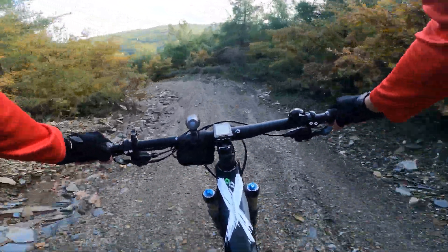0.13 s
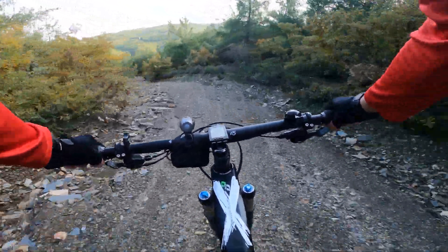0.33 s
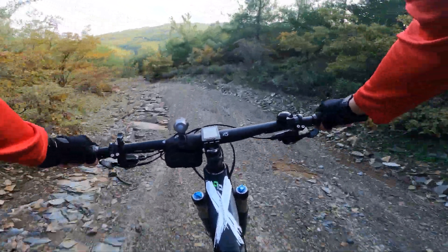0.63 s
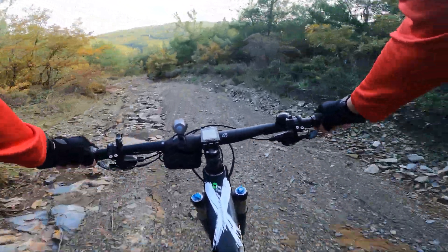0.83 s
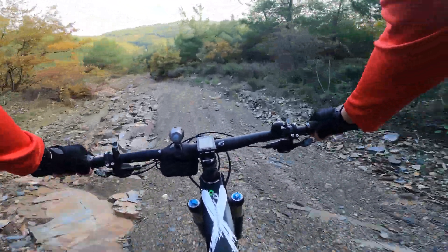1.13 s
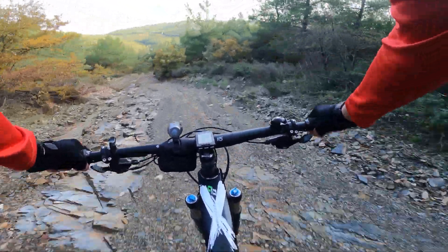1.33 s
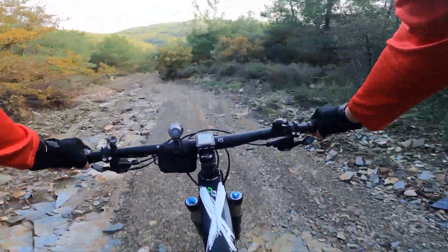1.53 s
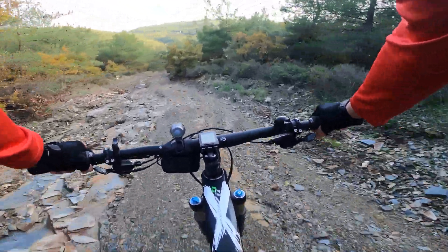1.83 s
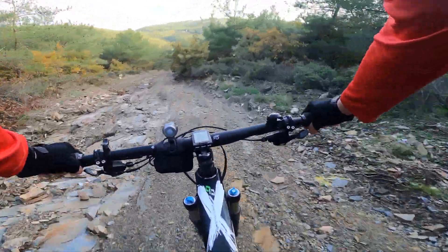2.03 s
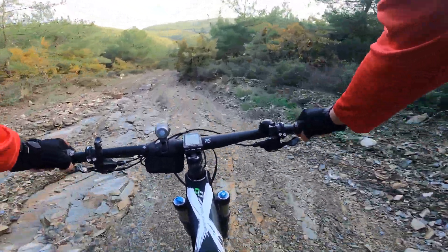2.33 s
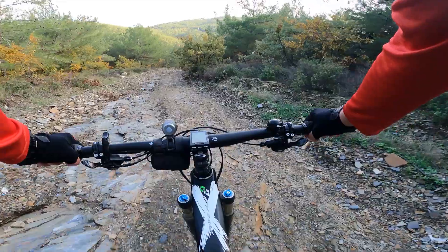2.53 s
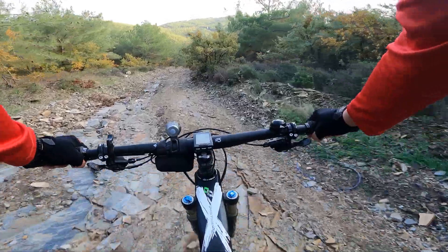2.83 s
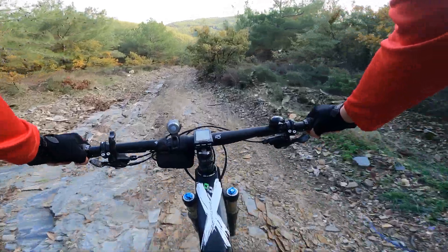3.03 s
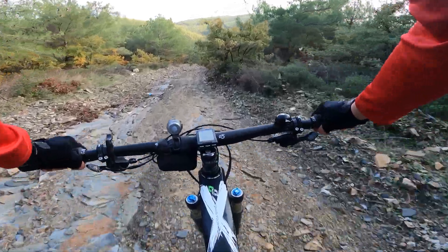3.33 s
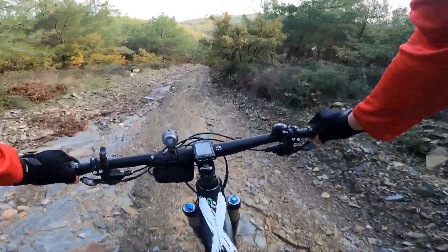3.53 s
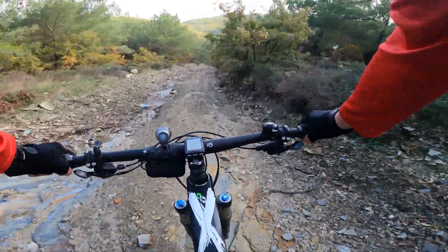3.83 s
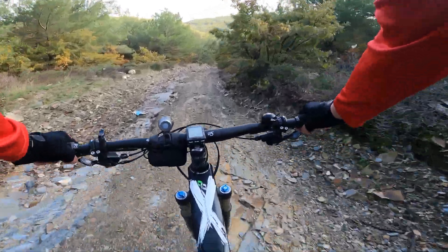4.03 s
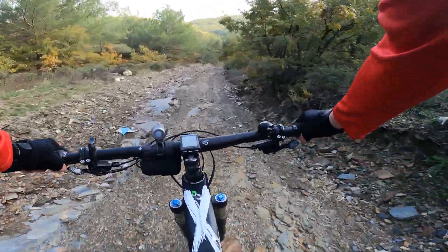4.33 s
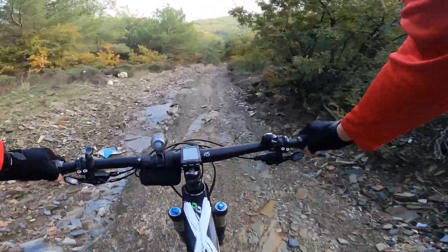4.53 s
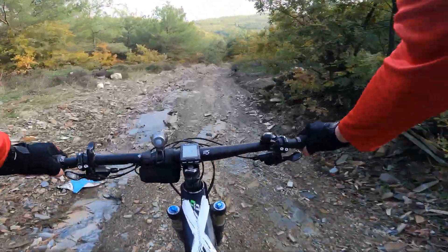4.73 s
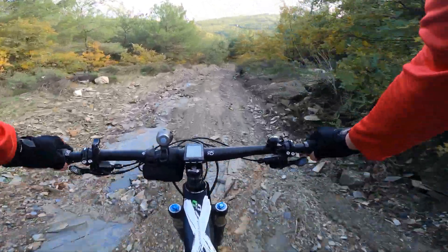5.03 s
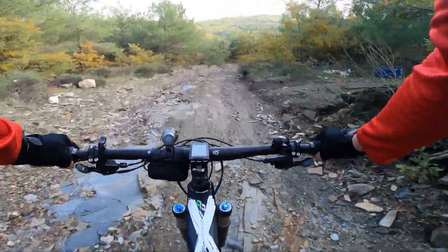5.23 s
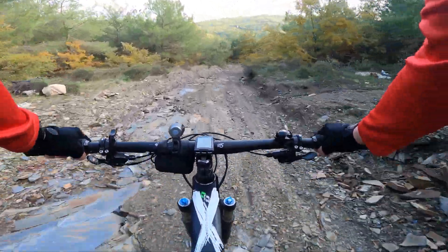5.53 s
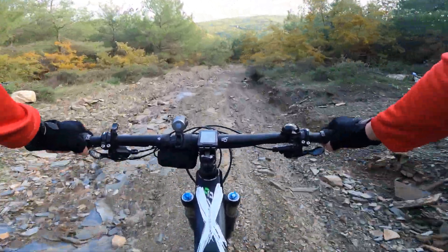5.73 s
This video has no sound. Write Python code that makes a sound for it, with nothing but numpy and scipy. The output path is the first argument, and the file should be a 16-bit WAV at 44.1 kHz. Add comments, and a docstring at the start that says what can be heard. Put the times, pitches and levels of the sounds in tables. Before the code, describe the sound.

Mountain bike rolls over loose stony gravel, tyres crunching and stones knocking the wheels, while low wind buffets the close microphone.

```python
"""Mountain bike on a stony forest track

Place: the bike rolls over loose stones; microphone in a camera on the rider's chest, close above the wheels.
Gravel, slate and grit are random clicks through bands, knocks and resonances; stones, chips and cables are
short damped knocks that also shake the frame or the bar. Wind is band noise in low lumps that weakens as
the bike slows; jolts ring the camera mount, and a thin, very high hiss swells once."""
import sys
import numpy as np
from scipy import signal
from scipy.io import wavfile
from scipy.ndimage import uniform_filter1d

SR = 44100
rng = np.random.default_rng(int(sys.argv[2]) if len(sys.argv) > 2 else 0)


def unload_audio(sound):
    """Save the sound as a 16-bit wav file, at the path given as the first command line argument."""
    columns = np.transpose(np.atleast_2d(sound))
    # keep every value between -1 and 1, then stretch to whole-number steps
    steps = np.round(np.clip(columns, -1, 1) * 32767)
    wavfile.write(sys.argv[1], SR, steps.astype(np.int16))


N = 259749
TIME = np.arange(N) / SR


def from_db(db):
    """Decibels to gain."""
    return 10 ** (np.asarray(db) / 20)


def rms_one(x):
    """Scale to an rms of 1."""
    return x / np.sqrt(np.mean(x ** 2) + 1e-20)


def in_time(rows):
    """Each column of a curve, sample by sample."""
    s, *columns = np.transpose(rows)
    return [np.interp(TIME, s, column) for column in columns]


def butter(x, hz, kind, order=2):
    """Butterworth filter."""
    sos = signal.butter(order, np.clip(hz, 10, .45 * SR), kind, fs=SR, output="sos")
    return signal.sosfilt(sos, x + 1e-18)


def lifted(x, hz, width_hz, lift_db):
    """Raise one narrow band, or lower it if the lift is negative."""
    band = signal.lfilter(*signal.iirpeak(hz, hz / width_hz, fs=SR), x)
    return x + (from_db(lift_db) - 1) * band


def drift(rate):
    """Smooth random wander of rms 1, quicker at a higher rate."""
    r = np.exp(-80 * np.pi * rate / SR)
    noise = rng.standard_normal(N // 40 + 2002)
    # one point every 40 samples; the start-up of the filter is thrown away
    slow = signal.lfilter([1], [1, -2 * r, r * r], noise)[2000:]
    return np.interp(np.arange(N) / 40, np.arange(len(slow)), rms_one(slow))


def bands(spectrum, count):
    """Equal log-spaced bands over a spectrum: (edges, centre in Hz, share of the amplitude)."""
    hz, db = np.transpose(spectrum)
    edges = np.geomspace(hz[0], hz[-1], count + 1)
    centres = np.sqrt(edges[1:] * edges[:-1])
    density = from_db(np.interp(np.log(centres), np.log(hz), db))
    gains = density * np.sqrt(np.diff(edges))
    return zip(zip(edges, edges[1:]), centres, gains / np.linalg.norm(gains))


def grains(per_s, spread_db):
    """Clicks at random moments, of random size and sign; rms 1."""
    at = np.flatnonzero(rng.random(N) < per_s / SR)
    size = from_db(spread_db * np.minimum(rng.exponential(1, len(at)), 4))
    clicks = np.zeros(N)
    clicks[at] = size * rng.choice([-1, 1], len(at))
    return rms_one(clicks)


def body(force, modes, contact_hz):
    """Damped modes struck through a soft contact; a unit click peaks at 1."""
    def respond(x):
        """Sum of the modes with alternating signs, dulled by the contact."""
        out = 0
        for k, (hz, width, db) in enumerate(modes):
            r = np.exp(-np.pi * width / SR)
            zeros = (1 - r * r) / 2 * np.array([1, 0, -1])
            poles = [1, -2 * r * np.cos(2 * np.pi * hz / SR), r * r]
            out = out + (-1) ** k * from_db(db) * signal.lfilter(zeros, poles, x + 1e-18)
        return butter(out, contact_hz, "low")
    return respond(force) / np.abs(respond(signal.unit_impulse(SR // 10))).max()


def taps(rows):
    """One click for each (time, level) row."""
    force = np.zeros(N)
    for s, db in rows:
        force[round(s * SR)] += from_db(db)
    return force


def rubbed(level, modes, per_s, spread_db, contact_hz):
    """A dense run of small contacts keeps a body ringing."""
    return rms_one(body(grains(per_s, spread_db), modes, contact_hz)) * level


def swells(rows, attack_s, release_s):
    """Gain of (start, length, level) events: each rises, holds until its length is up and dies away."""
    power = np.zeros(N)
    for start, length, db in rows:
        age = TIME - start
        shape = np.clip(age / attack_s, 0, 1) * np.exp(-np.maximum(age - length, 0) / release_s)
        power += (from_db(db) * shape) ** 2
    return np.sqrt(power)


def on_top(steady_db, gain):
    """Level in dB of a steady sound with swells added to it."""
    return 10 * np.log10(from_db(steady_db) ** 2 + gain ** 2)


def tock(hz, rise_cycles):
    """A heavily damped knock that swells and dies within a few cycles; envelope peak 1, a quarter second."""
    cycles = hz * np.arange(SR // 4) / SR
    rise = cycles / rise_cycles
    return (rise * np.exp(1 - rise)) ** 3 * np.sin(2 * np.pi * cycles)


# steady airflow on the microphone, dropping as the bike slows: (time [s], relative level [dB])
HEADWIND = [(0, -19), (1.6, -21.5), (2.05, -23.5), (3.9, -25.5), (4.0, -30), (5.5, -30.5), (5.89, -27)]
# gusts on top of it: (start [s], length [s], relative level [dB])
GUSTS = [(0, 0.22, -19.5), (.21, 0.22, -21), (.49, 0.25, -25), (.94, 0.21, -21.5), (1.14, 0.12, -16.5),
         (1.3, 0.085, -21.5), (1.44, 0.11, -18), (1.54, 0.13, -17), (1.89, 0.058, -16.5),
         (2.09, 0.059, -20), (2.2, 0.091, -16.5), (2.35, 0.081, -17.5), (2.53, 0.15, -19),
         (2.74, 0.14, -17.5), (2.94, 0.033, -19.5), (3.16, 0.08, -18.5), (3.34, 0.18, -20.5),
         (3.62, 0.2, -20.5), (3.89, 0.11, -22.5), (4.55, 0.051, -27), (5.27, 0.12, -27),
         (5.58, 0.16, -25.5), (5.83, 0.062, -23.5)]
GUST_ATTACK_S, GUST_RELEASE_S = 0.0049, 0.018
# spectrum of the wind at the microphone: (frequency [Hz], density [dB per Hz])
WIND_SPECTRUM = [(15, 6), (25, -1), (40, 5), (70, 2), (100, -1.5), (135, -9), (165, -15.5), (240, -28.5),
                 (400, -37.5)]


def wind(lump_s=0.08, reach=0.37):
    """Eddies pass the microphone port as a run of low lumps; stronger gusts lean towards higher ones."""
    air_db = on_top(in_time(HEADWIND)[0], swells(GUSTS, GUST_ATTACK_S, GUST_RELEASE_S))
    out = 0
    for edges, hz, gain in bands(WIND_SPECTRUM, count=14):
        lean_db = reach * (air_db - air_db.mean()) * np.log2(hz / 60)
        # a second of run-up settles the narrow low bands
        noise = butter(rng.standard_normal(N + SR), edges, "band")[SR:]
        out = out + gain * from_db(lean_db) * rms_one(noise)
    # level the lumps, so that the gust alone sets their size
    strength = np.sqrt(uniform_filter1d(out ** 2, int(lump_s * SR)) + 1e-3)
    return out / strength * from_db(air_db - 2.5)


SIZZLE_PEAK_S, SIZZLE_DB, SIZZLE_WIDTH_S, SIZZLE_FADE_DB = 5.4, -66.5, 0.61, 7


def sizzle():
    """A thin, very high hiss of band noise swells once and fades on both sides."""
    away = np.hypot(1, (TIME - SIZZLE_PEAK_S) / SIZZLE_WIDTH_S) - 1
    hiss = butter(rng.standard_normal(N), [11600, 13700], "band", order=1)
    return from_db(SIZZLE_DB - SIZZLE_FADE_DB * away) * rms_one(hiss)


# bumps that jolt the camera mount: (time [s], level [dB])
JOLTS = [(.237, -10.5), (.312, -16), (.358, -17.5), (.555, -19), (1.152, -17), (1.222, -13), (1.381, -12.5),
         (1.580, -8.5), (2.248, -16), (3.336, -13), (3.353, -13.5), (3.361, -14), (3.630, -19),
         (3.740, -30), (3.770, -24), (5.848, -27)]
# resonances of the mount: (frequency [Hz], width [Hz], relative level [dB])
MOUNT_MODES = [(128.5, 57, 7.5), (268, 53, 4), (332, 53, -0.5)]


def mount_jolts():
    """Each bump is one soft blow that rings the camera mount at the chest."""
    return body(taps(JOLTS), MOUNT_MODES, contact_hz=513)


KNOCK_RISE_CYCLES, CLACK_RISE_CYCLES = 1.094, 1.74
CRACK_HZ, CRACK_CYCLES = 2600, 0.81  # bright tick shared by stones and cables
SNAP_DB = -9.5  # relative to the clack
# cables that slap the handlebar: (time [s], relative level [dB], pitch [Hz])
CLACKS = [(.506, -19, 2010), (.840, -19, 1750), (1.143, -16, 2080), (1.248, -12, 1840), (1.530, -16, 1820),
          (1.639, -13.5, 1950), (1.659, -16, 1700), (1.728, -16, 1500), (1.733, -16, 1750),
          (1.873, -16.5, 1650), (1.927, -12.5, 1850), (2.155, -13.5, 1560), (2.161, -9, 1650),
          (2.365, -14, 1950), (2.37, -10.5, 1830), (2.563, -15.5, 1850), (2.864, -13, 1850),
          (2.905, -24, 1700), (3.162, -12, 1780), (3.206, -17.5, 1700), (3.7285, -10.5, 1710),
          (3.735, -20, 1760), (3.764, -10.5, 1760), (4.036, -16.5, 1820), (4.428, -18.5, 2200),
          (4.663, -16, 1940), (4.702, -19, 1840), (4.836, -19, 1720), (4.904, -18, 1820),
          (5.5775, -8, 1860), (5.782, -17, 1880)]


def cables(bar_hz=760, bar_db=-11):
    """A cable housing slaps the bar: one dry clack, a bright snap near its peak, a duller knock of the bar."""
    out = np.zeros(N + SR)
    snap = from_db(SNAP_DB) * tock(CRACK_HZ, CRACK_CYCLES)
    bar = from_db(bar_db) * tock(bar_hz, KNOCK_RISE_CYCLES)
    for s, level_db, hz in CLACKS:
        slap = tock(hz, CLACK_RISE_CYCLES) + bar
        out[round(s * SR):][:len(slap)] += from_db(level_db) * slap
        # the snap starts one cycle into the clack
        out[round((s + 1 / hz) * SR):][:len(slap)] += from_db(level_db) * snap
    return out[:N]


# small chips that snap from under the tread: (time [s], relative level [dB], hardness [dB per octave])
CHIPS = [(.279, -26, -6), (.348, -20, 4), (.452, -21.5, 2), (.567, -29, 14), (.613, -16, -18),
         (.615, -17, -19), (.840, -23, -1), (.950, -16.5, -18), (1.126, -19, 0), (1.142, -28, 12),
         (2.256, -22, 14), (2.371, -24, 1), (2.904, -23, -13), (3.164, -21, 3), (3.584, -20, 3),
         (3.660, -23, 5), (3.794, -23, 0), (4.068, -24, -15), (4.082, -23, -10), (4.428, -30, -13),
         (4.837, -24, 2), (5.07, -23, -1), (5.200, -22, -6), (5.555, -27, 7), (5.828, -29, -2)]
# resonances of small chips: (frequency [Hz], width [Hz], relative level [dB])
CHIP_MODES = [(2620, 140, 19.5), (3270, 210, 21.5), (5160, 2500, 6), (6900, 1500, -11)]


def chips():
    """Each chip snaps with one bright tick; a hard one excites the higher modes more."""
    out, snap = np.zeros(N + SR), signal.unit_impulse(SR // 20)
    for s, level_db, hardness in CHIPS:
        modes = [(hz, width, db + hardness * np.log2(hz / 3000)) for hz, width, db in CHIP_MODES]
        out[round(s * SR):][:len(snap)] += from_db(level_db) * body(snap, modes, contact_hz=8040)
    return butter(out[:N], 10000, "low", order=4)


# hard hits that leave a short hollow ring: (time [s], relative level [dB], starting pitch [Hz])
RINGS = [(4.068, -21.5, 1004), (4.735, -26, 885), (4.839, -22.5, 560), (5.206, -21.5, 1035)]
RING_SAG_PER_S, RING_ATTACK_S, RING_T60_S = 14, 0.0025, 0.16


def rings(rough=0.4):
    """A hollow, slightly rough ring slides down in pitch as it dies."""
    out, age = np.zeros(N + SR), np.arange(SR // 6) / SR
    envelope = np.minimum(age / RING_ATTACK_S, 1) * from_db(-60 * age / RING_T60_S)
    for s, level_db, hz in RINGS:
        pitch_hz = hz * np.exp(-RING_SAG_PER_S * age)
        tone = np.sin(2 * np.pi * np.cumsum(pitch_hz) / SR)
        flutter = 1 + rough * rms_one(butter(rng.standard_normal(len(age)), 200, "low"))
        out[round(s * SR):][:len(age)] += from_db(level_db) * envelope * flutter * tone
    return out[:N]


# a tyre scrubs sideways through loose slate: (start [s], length [s], relative level [dB])
SCRUBS = [(1.16, 0.244, -26.5), (1.415, 0.027, -21.5), (1.5, 0.033, -23.5)]
SCRUB_ATTACK_S, SCRUB_RELEASE_S = 0.0066, 0.0063
# resonances of the slate: (frequency [Hz], width [Hz], relative level [dB])
SLATE_MODES = [(770, 80, 10), (1050, 330, 6.5), (1266, 330, 7.5), (1900, 260, 0), (3170, 930, -7)]


def slate_scrub():
    """Many small contacts keep the loose slate ringing while the tyre scrubs through it."""
    level = swells(SCRUBS, SCRUB_ATTACK_S, SCRUB_RELEASE_S)
    return rubbed(level, SLATE_MODES, per_s=900, spread_db=-0.5, contact_hz=4130)


# steady drumming of the tread knobs: (time [s], relative level [dB])
TREAD = [(0, -32.5), (2.2, -33), (2.45, -38), (4.3, -34), (4.8, -33.5), (5.5, -37)]
# the knobs drum over slabs of bare rock: (start [s], length [s], relative level [dB])
SLABS = [(.22, 0.26, -34), (1.33, 0.14, -25), (1.54, 0.046, -26), (4.82, 0.084, -30.5), (5.12, 0.11, -29.5)]
SLAB_ATTACK_S, SLAB_RELEASE_S = 0.018, 0.032
# resonances of the tyre, also thudded by stones: (frequency [Hz], width [Hz], relative level [dB])
TYRE_MODES = [(247, 52, 1.4), (350.6, 54, 0.36), (466, 122, -1.3)]


def drumming():
    """Tread knobs strike the ground and keep the tyre's low modes ringing, louder on slabs."""
    tread_db = on_top(in_time(TREAD)[0], swells(SLABS, SLAB_ATTACK_S, SLAB_RELEASE_S))
    return rubbed(from_db(tread_db), TYRE_MODES, per_s=400, spread_db=0.5, contact_hz=850)


# resonances of frame and wheels: (frequency [Hz], width [Hz], relative level [dB])
FRAME_MODES = [(274, 83, -5.5), (444, 114, 9), (650, 234, 3), (926, 184, 4), (1426, 104, -1.5),
               (2000, 540, -4.5), (2920, 200, -10), (3240, 210, -12.5)]


def frame(blow, hardness):
    """Frame and wheels ring briefly; a hard stone excites the higher modes more."""
    modes = [(hz, width, db + hardness * np.log2(hz / 900)) for hz, width, db in FRAME_MODES]
    return body(blow, modes, contact_hz=3750)


def chatter(t60, per_s, level_db, first_db, bounce_s=0.0039):
    """One firm touch, a short bounce, then a dying run of small random ones; a quarter of a second."""
    age = np.arange(SR // 4) / SR
    happens = rng.random(len(age)) < per_s / SR
    touches = happens * rng.uniform(-1.47, 1, len(age)) * from_db(level_db - 60 * age / t60)
    touches = touches * np.minimum(age / bounce_s, 1) ** 2
    touches[0] = from_db(first_db)
    return touches


RATTLE_T60_S = .16
KNOCK_Q, KNOCK_LIFT_DB = 18, 2.5  # the rattle is lifted at the pitch of the knock
CRACK_DB, THUD_DB, THUD_CONTACT_HZ = -15, -12, 600
# stones that strike the wheels: (time [s], relative level [dB], hardness [dB per octave],
# rattle afterwards [dB], pitch of the knock [Hz])
STONES = [(.034, -17.5, -11, -9, 750), (0.227, -21.5, 0.5, 0.5, 700), (.262, -18, -8, -5, 850),
          (.278, -14.5, 5, -27, 770), (.339, -15, 4, -16, 760), (.506, -18, -4, -23, 845),
          (0.554, -16, 1, -21, 456), (0.561, -20, 5, -23, 1200), (1.143, -16, 13, -25, 840),
          (1.222, -14.5, 6, -20, 940), (1.379, -13, 16, -24, 920), (1.574, -15, -3, -14, 990),
          (1.989, -24, 9, -19, 750), (2.251, -15.5, 4, -14, 1010), (2.737, -18, 2, -12, 820),
          (2.905, -14, 7, -17, 1110), (3.135, -12, 2.5, -4.5, 840), (3.147, -12.5, 4, -22, 910),
          (3.356, -12.5, -14, -7, 640), (3.464, -17.5, -2, -6, 555), (3.517, -12.5, 4, -19, 486),
          (3.550, -14, -5, -11, 844), (3.630, -10.5, 10, -24, 684), (3.786, -23, -5, -18, 665),
          (3.95, -18, -6, -16, 800), (4.067, -13, 7, -10.5, 910), (4.157, -11.5, -1, -14, 770),
          (4.173, -17.5, 2, -5.5, 685), (4.217, -22, 2, -16, 690), (4.303, -25, 6, -5, 705),
          (4.314, -12.5, 2.5, -8, 700), (4.370, -19, 2, -6, 585), (4.390, -15, 3, -17, 520),
          (4.715, -18, 6, -6, 720), (4.735, -20, -7, -6, 845), (4.813, -22.5, 15, -2.5, 496),
          (4.836, -11, 2, -15, 453), (4.845, -24, -7, -19, 784), (4.907, -20.5, -0.5, -2.5, 445),
          (5.039, -15.5, 2, -22, 740), (5.070, -15, 7, -11, 764), (5.079, -15.5, -5, -17, 417),
          (5.141, -14.5, 2, -8.5, 750), (5.159, -11.5, 1.5, -8.5, 840), (5.168, -13, -7, -7, 570),
          (5.199, -18.5, 4, -5.5, 523), (5.816, -15.5, 1, -14, 925), (5.878, -18.5, -2.5, -2, 770)]


def stones(crack_lean=0.6):
    """Each stone cracks, knocks and thuds through the tyre; chain and loose parts chatter on the frame."""
    out = np.zeros(N + SR)
    for s, level_db, hardness, rattle_db, hz in STONES:
        blow = chatter(RATTLE_T60_S, per_s=900, level_db=rattle_db, first_db=-5.5)
        rattle = lifted(frame(blow, hardness), hz, hz / KNOCK_Q, KNOCK_LIFT_DB)
        crack = from_db(CRACK_DB + crack_lean * min(hardness, 3)) * tock(CRACK_HZ, CRACK_CYCLES)
        gain, at = from_db(level_db), round(s * SR)
        out[at:][:len(blow)] += gain * tock(hz, KNOCK_RISE_CYCLES)
        # the stone cracks and the frame is shaken as the knock peaks
        peak_at = at + round(KNOCK_RISE_CYCLES / hz * SR)
        out[peak_at:][:len(blow)] += gain * (crack + rattle)
    blows = taps([(s, db + THUD_DB) for s, db, *_ in STONES])
    thuds = body(blows, TYRE_MODES, THUD_CONTACT_HZ)
    return butter(out[:N], 15000, "low", order=4) + thuds


# sprays of sand thrown off the tread: (start [s], length [s], relative level [dB])
SPRAYS = [(1.5, 0.061, -39), (1.96, 0.056, -37.5)]
SPRAY_ATTACK_S, SPRAY_RELEASE_S = 0.012, 0.01
# spectrum of the grit: (frequency [Hz], density [dB per Hz])
GRIT_SPECTRUM = [(2350, -5.5), (2800, -1.5), (3300, 3), (3800, -1), (4200, -1), (4400, 1), (4800, 0.5),
                 (5500, 0), (6100, -6), (7700, -9), (9000, -16), (10000, -22.5), (11000, -26.5),
                 (12300, -40)]


def grit(grit_db, load, patchy_db=2.0):
    """Sand and tiny chips crackle so densely that they merge into a hiss."""
    level_db = on_top(grit_db + 3, swells(SPRAYS, SPRAY_ATTACK_S, SPRAY_RELEASE_S))
    out = 0
    for edges, hz, gain in bands(GRIT_SPECTRUM, count=32):
        crackle = rms_one(butter(grains(7000, 0.99), edges, "band"))
        out = out + gain * crackle * from_db(patchy_db * drift(27))
    return out * from_db(level_db - 1.72 + 0.88 * load)


def pebbles(crunch_db, fineness, load, per_s=150, below_db=-5.5, rise_cycles=1.16, lean_db=-4.0, clump_db=1.5):
    """Slate flakes tick in clumps as the tyre presses, each at its own pitch; fine gravel ticks higher."""
    pitches, ticks = np.geomspace(650, 3000, num=12), 0
    for hz in pitches:
        hits = grains(per_s / len(pitches), spread_db=-2.5)
        knocks = signal.oaconvolve(hits, tock(hz, rise_cycles))[:N]
        size = from_db((lean_db + fineness) * np.log2(hz / 1200))
        ticks = ticks + size * rms_one(knocks)
    return rms_one(ticks * from_db(clump_db * load)) * from_db(crunch_db + below_db)


# spectrum of the gravel crunch: (frequency [Hz], density [dB per Hz])
CRUNCH_SPECTRUM = [(185, 3.5), (250, 5), (310, 0), (480, 3), (900, 3), (1150, -2), (1800, -2), (2100, -3),
                   (2400, -9), (3100, -10.5)]


def gravel(crunch_db, fineness, load, spread_db=3.0, patchy_db=1.5, together=0.76):
    """Pebbles grind and collide under the tread; more of them collide where the crunch is louder."""
    per_s = 1800 * from_db(crunch_db - crunch_db.mean())
    broad, out = grains(per_s, spread_db), 0
    for edges, hz, gain in bands(CRUNCH_SPECTRUM, count=30):
        # a collision is heard in all bands, each pebble's own ring in only one
        own = grains(per_s / 2, spread_db)
        clicks = np.sqrt(together) * broad + np.sqrt(1 - together) * own
        lean_db = fineness * np.log2(hz / 800)
        ring = rms_one(butter(clicks, edges, "band"))
        out = out + gain * ring * from_db(lean_db + patchy_db * drift(28.4))
    return rms_one(out) * from_db(crunch_db + 1.8 * load)


# ground under the tyres: (time [s], gravel crunch, relative level [dB], fine grit, relative level [dB])
GROUND = [(0.0, -32, -43.5), (.19, -33, -43), (.25, -30, -42.5), (0.51, -29, -42.5), (0.95, -29.5, -39.5),
          (1.16, -27, -39.5), (1.36, -25, -39.5), (1.44, -25, -46), (1.475, -31, -42), (1.51, -27, -42.5),
          (1.6, -28, -42), (1.9, -28, -42), (2.26, -29, -42.5), (3.1, -32, -42), (3.58, -29, -42),
          (3.82, -31, -44.5), (4.15, -33.5, -44), (4.5, -34, -44), (4.69, -32, -43), (5.0, -31, -44),
          (5.49, -34, -45), (5.89, -31, -44)]
# size of the gravel: (time [s], lean of the crunch towards the treble [dB per octave])
FINENESS = [(0, 2.8), (.6, 0.9), (1.25, 1.5), (1.5, -1), (1.8, 0.1), (2.5, 1.5), (3.1, 1), (3.5, -1),
            (4.6, 0.5), (5.2, -2.5), (5.5, 1.1)]


def rolling():
    """Both tyres on the track: gravel, grit and pebbles share one fluctuating tyre pressure."""
    crunch_db, grit_db = in_time(GROUND)
    fineness, = in_time(FINENESS)
    # the tyres press and lift quickly; the suspension caps the pressure
    load = np.minimum(rms_one(butter(drift(18.5), 13.4, "high")), 1)
    return gravel(crunch_db, fineness, load) + grit(grit_db, load) + pebbles(crunch_db, fineness, load)


def scene():
    """Wind, mount, bike and tyres in one channel."""
    air = wind() + sizzle()
    parts = cables() + chips() + rings() + stones()
    tyres = slate_scrub() + drumming() + rolling()
    bike = from_db(-3.0) * (parts + tyres)
    return (air + mount_jolts() + bike)[None]


CUTOFF_HZ, FADE_S = 15700, .004
# narrow bands that the camera housing lifts or dips: (frequency [Hz], width [Hz], lift [dB])
HOUSING = [(622.7, 20, 6), (963, 150, 3), (1311, 39, 4.5), (1663, 110, 4), (2310, 110, -2), (2670, 40, 3),
           (3210, 150, 1.5), (5120, 220, 3.5), (5450, 87, -3), (5750, 81, 4.5), (7250, 150, -3.5)]


def record(dry):
    """The housing colours the sound; the camera drops the deepest rumble and cuts the top."""
    dry = dry * np.clip(np.minimum(TIME, TIME[::-1]) / FADE_S, 0, 1)
    for hz, width, lift_db in HOUSING:
        dry = lifted(dry, hz, width, lift_db)
    top_cut = signal.ellip(10, .1, 90, CUTOFF_HZ, fs=SR, output="sos")
    return signal.sosfilt(top_cut, butter(dry, 14, "high", order=1))


dry = scene()
out = record(dry)
unload_audio(out)
```